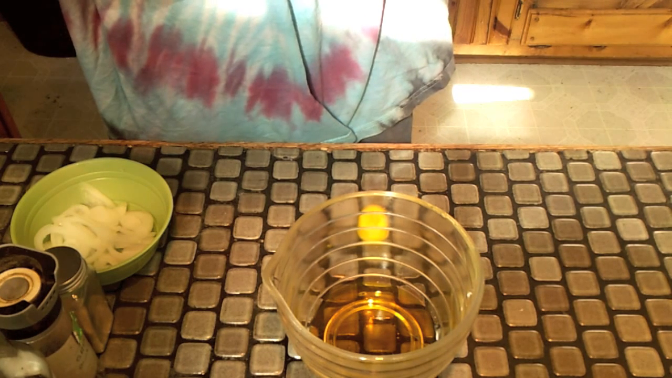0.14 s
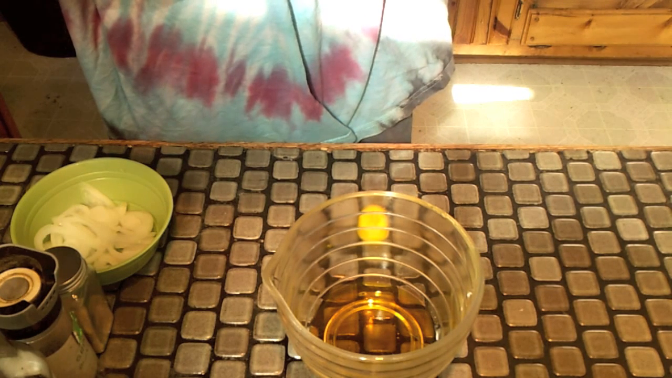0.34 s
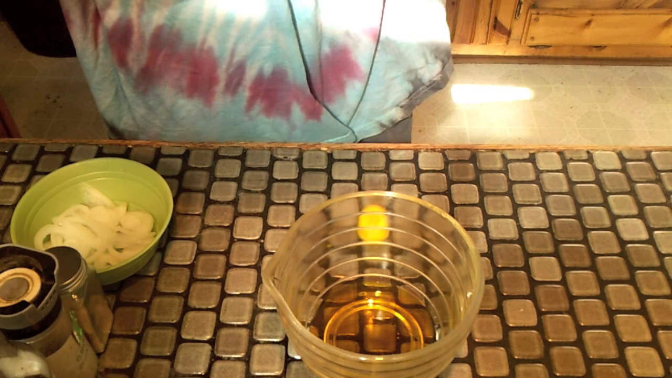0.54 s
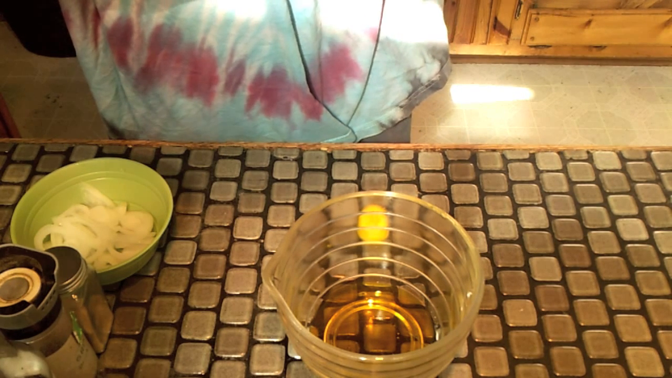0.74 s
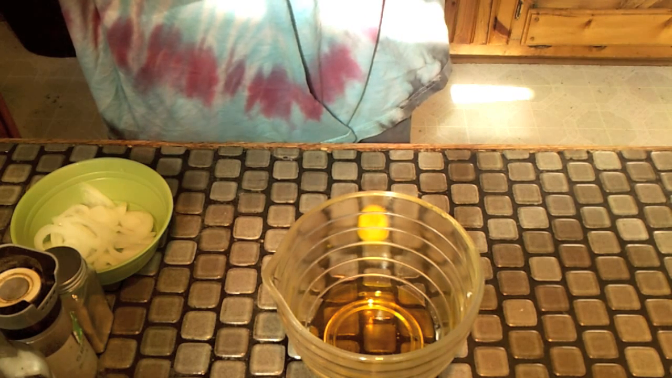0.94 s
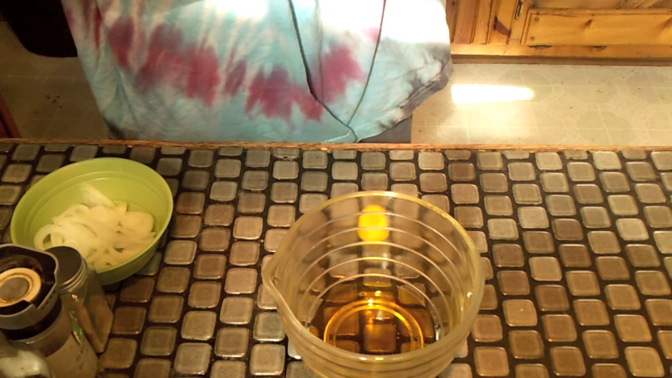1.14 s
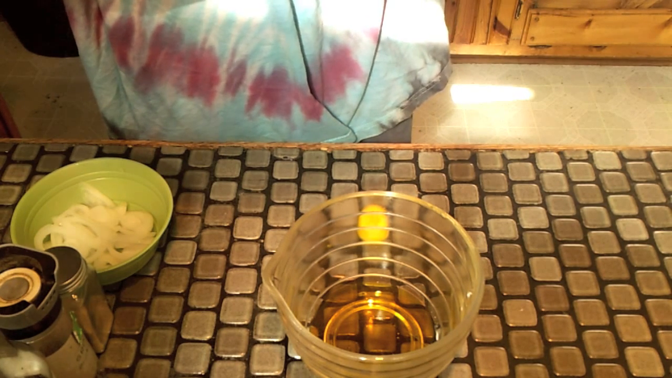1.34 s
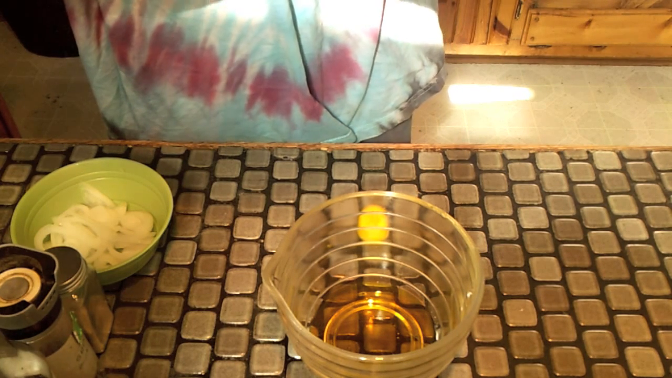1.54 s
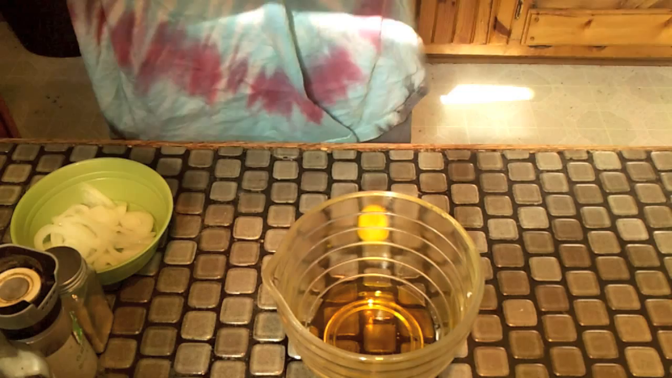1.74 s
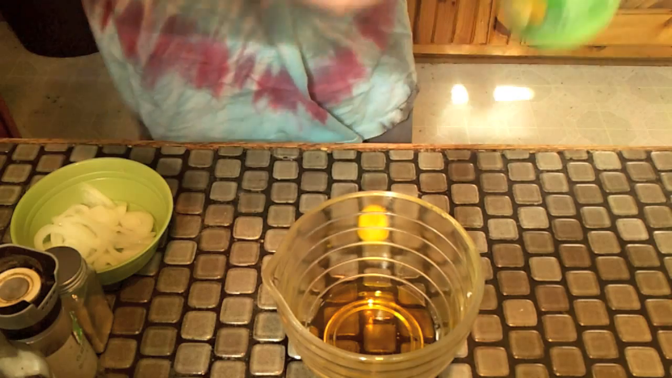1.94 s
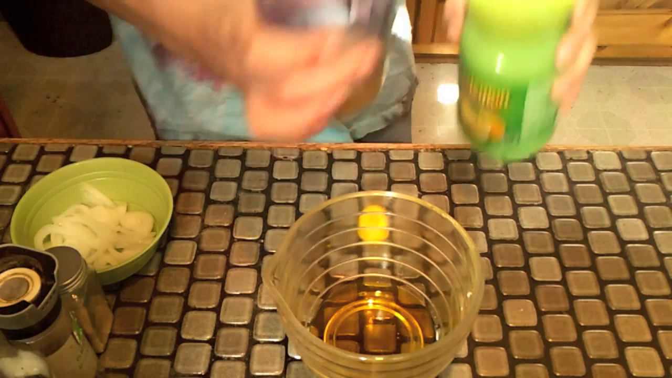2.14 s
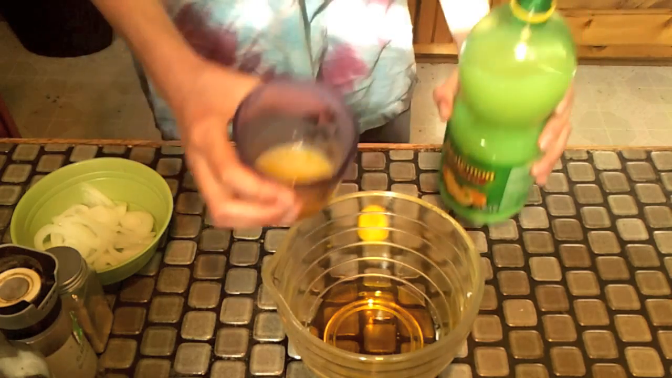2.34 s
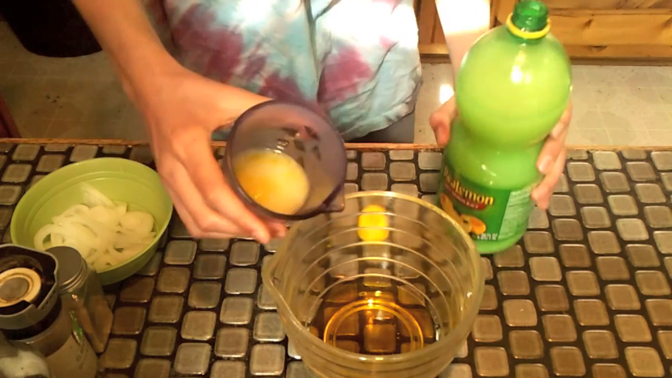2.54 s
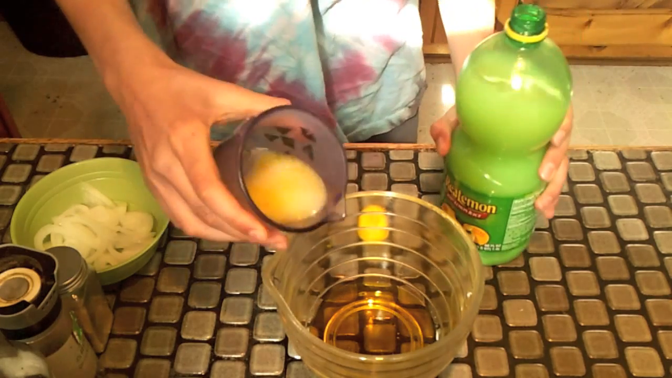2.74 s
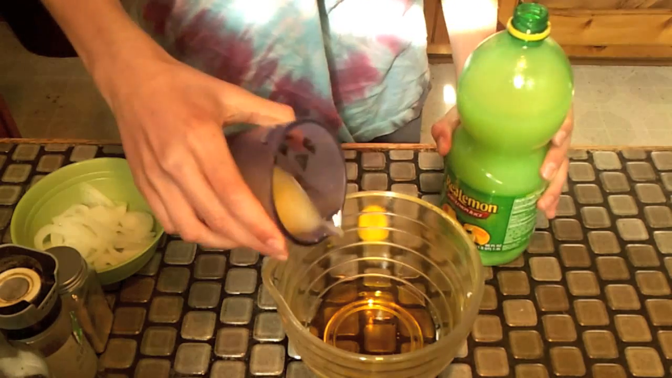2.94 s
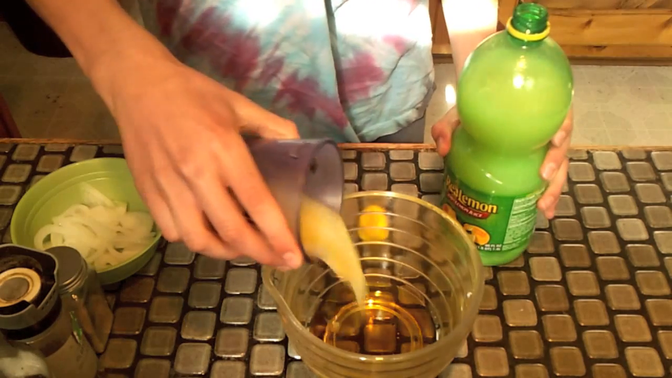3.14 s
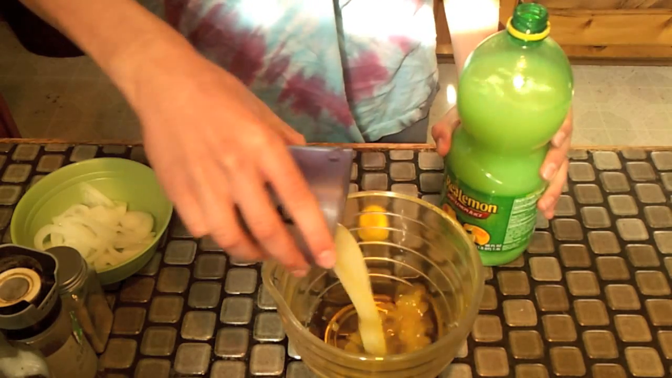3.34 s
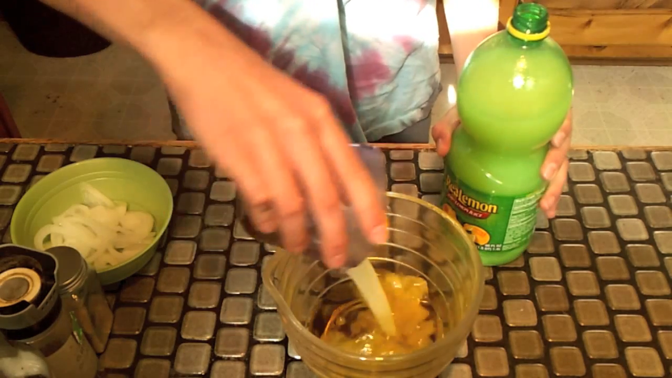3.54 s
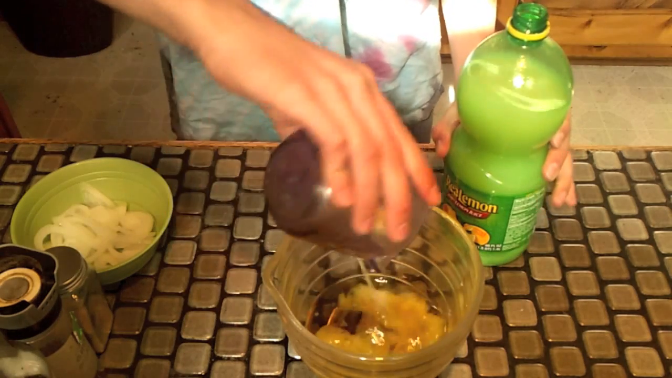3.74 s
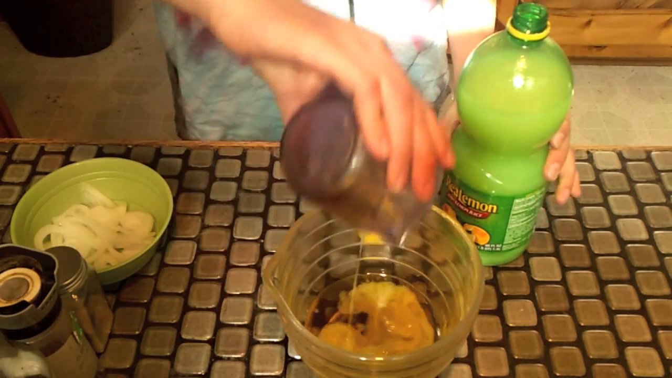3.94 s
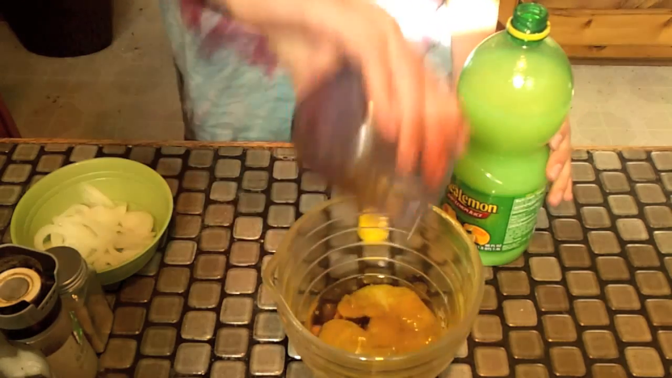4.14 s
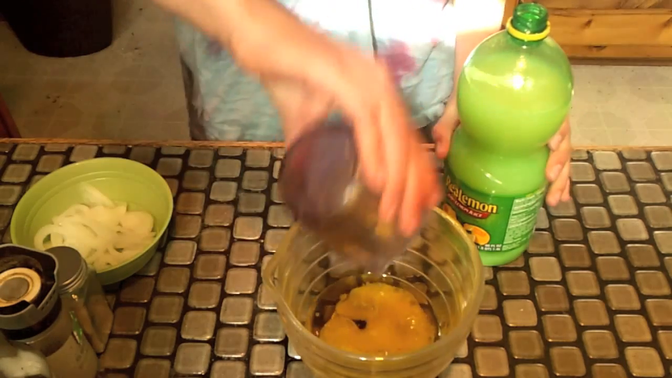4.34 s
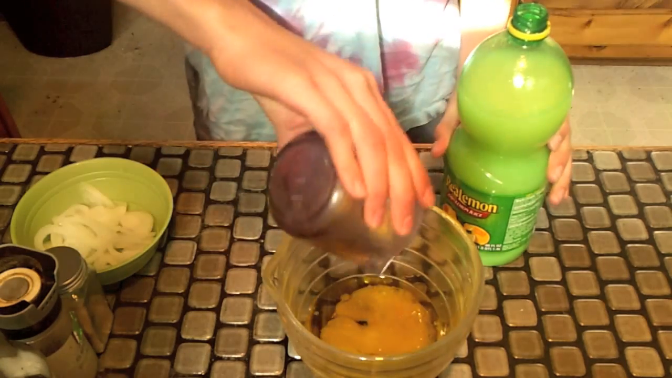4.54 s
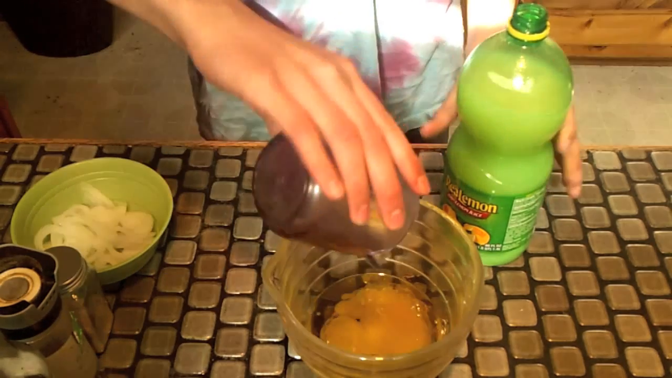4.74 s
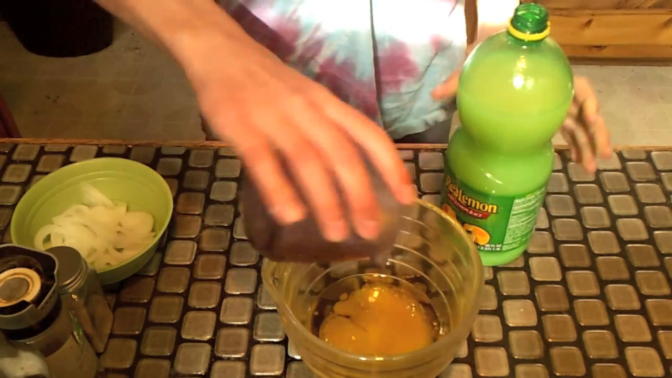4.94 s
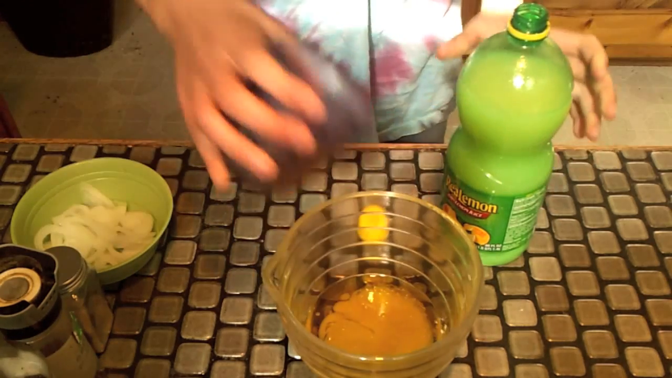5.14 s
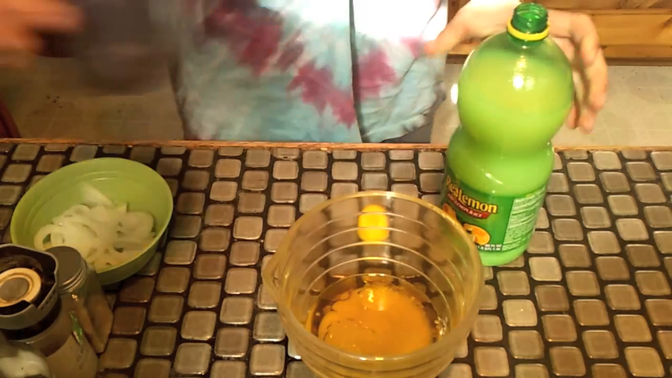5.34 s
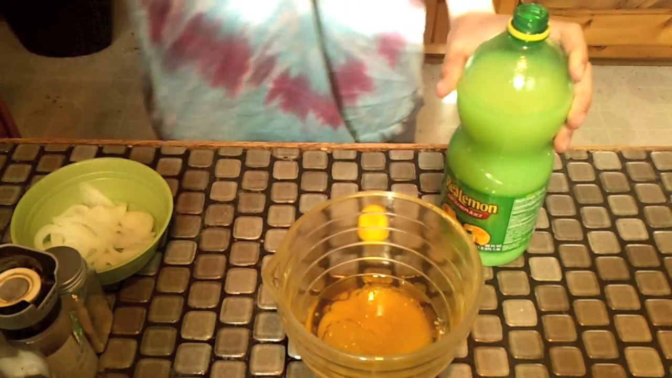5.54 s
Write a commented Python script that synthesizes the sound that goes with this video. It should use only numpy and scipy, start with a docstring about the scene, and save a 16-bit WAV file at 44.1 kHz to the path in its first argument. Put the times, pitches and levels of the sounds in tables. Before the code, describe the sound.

Small ticks, soft clothing rustles and a distant light knock come first, heard close up over kitchen room rumble and a faint high whine. Then comes the loudest sound, a bottle thumping onto tile, and the glass bowl beside it rings briefly. A short pour of juice into the bowl follows, with tiny high bubbles and a few sharp drips. Very faint far whistles and a last tick end it.

```python
"""Bottle and juice in a quiet kitchen

Close by, over room rumble and an electrical whine, cloth brushes and handled things tick. A bottle is set
down hard on a tiled counter and the glass bowl beside it rings. Juice tipped from a cup into the bowl
sounds as tiny ringing bubbles, then drips. Farther off are one light knock and a few faint whistles.
The microphone is a small one, with a treble peak and a gain control that ducks after loud sounds."""
import sys
import numpy as np
from scipy import signal
from scipy.fft import rfft, irfft, next_fast_len
from scipy.io import wavfile
from scipy.ndimage import uniform_filter1d

SR = 44100
rng = np.random.default_rng(int(sys.argv[2]) if len(sys.argv) > 2 else 0)


def transcribe(signal):
    """Save signal, clipped to [-1, 1], as a 16-bit WAV file at the path in sys.argv[1]."""
    frames = np.atleast_2d(signal).T
    limited = np.clip(frames, -1, 1)
    pcm = np.round(limited * 32767).astype(np.int16)
    wavfile.write(sys.argv[1], SR, pcm)


N = 246236

# spectrum of the empty room: frequency_hz, density_db
ROOM_SPECTRUM = [(12, 1), (22, -1), (50, -3), (86, -5), (134, -8), (200, -15), (330, -19.5), (500, -24),
                 (900, -30), (1600, -34), (2500, -37), (4500, -39), (7000, -41), (16000, -40)]
# slow swell of the rumble: time_s, gain_db
RUMBLE_SWELL = [(.5, 1.5), (4.4, -0.5), (5.3, 0.5)]
# lines of the electrical whine, lowest first: pitch_hz, rms_db
WHINE_LINES = [(5039, -71), (5642, -77), (5879, -58), (6121, -61), (6358, -69)]
# swell of the strongest line; the lowest sinks twice as far: time_s, gain_db
WHINE_SWELL = [(0, 0), (2, 0.5), (3, 3), (4.5, 2.5)]
# cloth and hands brushing: start_s, rise_s, t60_s, centre_hz, width_hz, level_db
RUSTLES = [(.19, 0.018, 0.25, 5000, 5000, -55), (0.545, 0.0023, 0.42, 2600, 6200, -45.5),
           (1.23, 0.0052, 0.15, 4630, 5000, -48), (2.2, 0.23, 1, 3850, 7000, -58),
           (5.0, 0.078, 1, 1590, 1500, -61), (5.33, 0.099, 0.37, 6100, 1500, -54.5)]
# dry ticks of things handled close by: start_s, level_db, pitch_hz
TICKS = [(.3833, -34.5, 6350), (.6526, -37, 2800), (.7063, -33, 4460), (0.725, -34, 6430),
         (0.7666, -27, 3350), (0.766, -24.5, 5920), (.8336, -32.5, 6850), (1.2369, -27, 4870),
         (1.2666, -27.5, 6260), (1.507, -36, 2940), (1.5174, -29, 5800), (1.659, -30, 6550),
         (1.701, -38, 6300), (2.1586, -36, 6030), (2.6054, -14, 5570), (2.8728, -32, 5820)]
# taps that leave a short ring or a dull hum: start_s, level_db, pitch_hz, t60_s
CLINKS = [(.3857, -36, 2610, 0.03), (0.6967, -32.5, 1090, 0.032), (0.714, -50, 2630, 0.089),
          (0.724, -47.5, 988, 0.22), (.765, -44.5, 867, 0.082), (1.233, -25.5, 1020, .014),
          (1.611, -41, 2920, 0.058), (1.7024, -49, 2310, 0.088), (2.049, -44, 351, 0.36),
          (2.849, -27.5, 209.5, 0.16)]
# pitchless clicks of hard contact or a splash: start_s, level_db
CLICKS = [(0.545, -31), (.731, -36), (1.235, -39), (1.517, -38.5), (1.659, -37), (1.701, -29.5),
          (3.321, -37), (3.548, -36), (3.6245, -38), (3.755, -49), (3.851, -30), (3.9213, -28),
          (3.943, -35), (3.9655, -35), (3.962, -31)]
# modes of a light thing put down farther off: pitch_hz, level_db, t60_s
KNOCK_MODES = [(328, -18.5, 0.37), (1108, -15, 0.1), (1640, -27, 0.038), (3391, -7, 0.0087),
               (5000, 2, 0.0059), (6520, -2.5, 0.0084)]
# its knock dying away: frequency_hz, density_db, t60_s
KNOCK_TAIL = [(300, 0, 0.08), (1090, -4, 0.18), (2400, -14.5, 0.25), (5000, -1.5, 0.18), (7000, -8, 0.18),
              (9900, -45, .08)]
# modes of bottle and counter: pitch_hz, level_db, t60_s
BOTTLE_MODES = [(158.4, -21, 0.49), (200.5, -19.5, 0.43), (228.4, -3, 0.19), (410, -13, 0.2),
                (473, -14, 0.074), (567, -13, 0.1), (685.6, -22.5, 0.46), (750, -9, 0.108),
                (1010, 2.5, 0.027), (1800, -34, 0.12), (3508, -0.5, 0.026), (3330, -12, 0.025),
                (3494, -22.5, 0.26), (3545, -21.5, .2), (3730, -15, .04), (4690, -7, 0.016),
                (6350, -8, 0.039), (6290, -28, .25), (9700, -38, 0.15)]
# the bottle's blow dying away in counter and room: frequency_hz, density_db, t60_s
BOTTLE_TAIL = [(90, -9, 0.54), (160, -10, 0.5), (398, -2.5, 0.33), (855, -3.5, 0.32), (1400, -14.5, 0.27),
               (2800, -20, 0.22), (5000, -27, 0.3), (6330, -18.5, 0.22), (7200, -26, 0.2), (11200, -57, .1)]
# modes of the glass bowl, in split pairs: pitch_hz, level_db, t60_s
BOWL_MODES = [(826.3, -30, 1.6), (849.2, -22, 0.8), (2105.5, -26.5, 0.69), (2172.8, -28, 0.65)]
# flow of the juice, as a level: time_s, level_db
JUICE_FLOW = [(3.3, -68), (3.42, -61.5), (3.83, -61.5), (3.86, -55.5), (3.97, -55.5), (4.06, -60),
              (4.3, -74)]
# single bubbles of the pour and the last drips: start_s, level_db, pitch_hz
BUBBLES = [(3.3219, -36.5, 1400), (3.416, -32, 5400), (3.446, -32.5, 4060), (3.4735, -33, 5430),
           (3.5081, -34, 5660), (3.517, -39.5, 2780), (3.5477, -32, 5880), (3.6247, -26, 5680),
           (3.7162, -37.5, 5400), (3.7546, -24.5, 6700), (3.764, -29, 5160), (3.8295, -35, 7300),
           (3.877, -36, 5200), (3.852, -39, 1570), (3.865, -38, 1780), (3.8703, -32, 6350),
           (3.922, -27, 7950), (3.9358, -31, 4200), (3.942, -38.5, 1450), (3.9568, -27, 6600),
           (3.9627, -28, 4350), (3.9757, -37, 2850), (3.983, -39, 2700), (4.0064, -28, 5870),
           (4.0095, -39, 2800), (4.1172, -33, 6500), (4.167, -33, 5880), (4.170, -36.5, 6240),
           (4.486, -44, 3870)]
# drops that hit hard: centre_s, level_db, pitch_hz
SPLATS = [(3.4007, -13, 5450), (3.8515, -34, 5700), (3.8518, -26, 4170), (4.1200, -28, 5800),
          (4.1201, -21.5, 4600)]
# far whistles: start_s, pitch_hz
WHISTLES = [(4.42, 1565), (4.552, 1565), (4.66, 1565), (4.96, 2050)]
# reflections off bowl and counter: lag_s, gain_db
NEAR_ECHOES = [(.0013, -17), (.0024, -13), (.0039, -17)]

BOTTLE_S, BOTTLE_DB = 2.5456, -4  # the one blow that rings bottle, counter and bowl


def from_db(db):
    """Decibels to gain."""
    return 10 ** (np.asarray(db) / 20)


def rms_one(x):
    """Scale to rms 1."""
    return x / np.sqrt(np.mean(x ** 2) + 1e-20)


def in_time(rows):
    """A (time_s, value) table at every sample."""
    return np.interp(np.arange(N) / SR, *np.transpose(rows))


def at_hz(rows, hz, column=1):
    """One column of a table, read along a log-frequency axis."""
    table = np.array(rows)
    return np.interp(np.log(hz), np.log(table[:, 0]), table[:, column])


def add(out, start_s, sound):
    """Mix a sound in at start_s."""
    i = round(start_s * SR)
    out[i:i + len(sound)] += sound[:N - i]


def butter(x, order, hz, kind="low"):
    """Butterworth filter."""
    return signal.sosfilt(signal.butter(order, hz, kind, fs=SR, output="sos"), x)


def resonance(x, hz, width_hz):
    """Pass a band around hz, gain 1 on top."""
    r, w = np.exp(-np.pi * width_hz / SR), 2 * np.pi * hz / SR
    gain = (1 - r * r) / 2
    return signal.lfilter([gain, 0, -gain], [1, -2 * r * np.cos(w), r * r], x)


def drift(rate_hz):
    """Smooth random wander, rms 1."""
    hop, settle = 40, 2000
    r = np.exp(-2 * np.pi * hop * rate_hz / SR)
    noise = rng.standard_normal(N // hop + settle + 2)
    slow = signal.lfilter([1], [1, -2 * r, r * r], noise)[settle:]
    return np.interp(np.arange(N) / hop, np.arange(len(slow)), rms_one(slow))


def room_tone(level_db=-40, heave_db=0.62):
    """Steady room noise whose rumble heaves and slowly swells."""
    hz = np.maximum(np.fft.rfftfreq(N, 1 / SR), 1)
    spectrum = rfft(rng.standard_normal(N)) * from_db(at_hz(ROOM_SPECTRUM, hz))
    tone = rms_one(irfft(spectrum, N))
    rumble = butter(tone, 2, 1500)
    swell = from_db(in_time(RUMBLE_SWELL) + heave_db * drift(15))
    return from_db(level_db) * (tone + (swell - 1) * rumble)


def whine(tone_hz=7867.1, tone_db=-59.5, flips_per_s=59.94):
    """Thin electrical lines that waver in level, and a tone whose sign keeps flipping."""
    t, swell_db = np.arange(N) / SR, in_time(WHINE_SWELL)
    flips = np.sign(np.sin(np.pi * flips_per_s * t))
    out = from_db(tone_db) * np.sin(2 * np.pi * tone_hz * t) * flips
    strongest = np.argmax([rms_db for _, rms_db in WHINE_LINES])
    for k, (hz, rms_db) in enumerate(WHINE_LINES):
        swell_share = 1 if k == strongest else -2 if k == 0 else 0
        level_db = rms_db + 1.2 * drift(2) + swell_share * swell_db
        out += np.sqrt(2) * from_db(level_db) * np.sin(2 * np.pi * (hz * t + rng.random()))
    return out


def rustles():
    """Cloth and hands: grainy noise that swells and fades with each brush."""
    out, t = np.zeros(N), np.arange(SR) / SR
    grainy = rng.standard_normal(N) * from_db(3 * drift(60))
    for start_s, rise_s, t60, hz, width_hz, level_db in RUSTLES:
        envelope = np.minimum(t / rise_s, 1) * from_db(level_db - 60 * np.maximum(t - rise_s, 0) / t60)
        brush = np.resize(grainy[round(start_s * SR):], SR)
        brush = resonance(resonance(brush, hz, width_hz), hz, width_hz)
        add(out, start_s, envelope * rms_one(brush))
    return butter(out, 4, 7500)


def pings(rows, glide, snap_db, roughness, attack_s=0.0003):
    """Short damped tones; all but the low ones open with a faint broad snap."""
    out = np.zeros(N)
    snaps = rng.standard_normal((len(rows), 64)) * np.exp(-np.arange(64) / 12)
    grain = 1 + roughness * drift(150)  # uneven contact shakes the ring
    for (start_s, level_db, hz, t60), snap in zip(rows, snaps):
        t = np.arange(round(t60 * SR)) / SR
        attack = (1 - np.exp(-t / max(attack_s, 1 / hz))) ** 3  # low tones take a cycle to build
        tone = np.sin(2 * np.pi * hz * (t + glide * t ** 2 / t60))
        add(out, start_s, attack * from_db(level_db - 60 * t / t60) * tone)
        if hz > 900:
            add(out, start_s, from_db(level_db / 2 + snap_db) * signal.lfilter([.5, .5], 1, snap))
    return out * grain


def handling(tick_t60_s=0.0067):
    """Small things touched close by, each ringing at one pitch."""
    ticks = [(*tick, tick_t60_s) for tick in TICKS]
    return pings(ticks + CLINKS, glide=0, snap_db=-30, roughness=.25)


def clicks(decay_s=0.00083):
    """Hard contacts and splashes: broad noise, gone in a few milliseconds."""
    out = np.zeros(N)
    bursts = rng.standard_normal((len(CLICKS), 300)) * np.exp(-np.arange(300) / (decay_s * SR))
    for (start_s, level_db), burst in zip(CLICKS, bursts):
        add(out, start_s, from_db(level_db) * burst)
    return butter(out, 3, [1500, 8400], "band")


def struck(start_s, modes, gain_db, build_s):
    """One blow rings every mode of a body."""
    out, t = np.zeros(N), np.arange(SR) / SR
    body = sum(from_db(db - 60 * t / t60) * np.sin(2 * np.pi * hz * t) for hz, db, t60 in modes)
    add(out, start_s, from_db(gain_db) * (1 - np.exp(-t / build_s)) * body)
    return out


def tail(start_s, table, gain_db):
    """Noise after a blow, each third of an octave dying at its own rate."""
    out, t = np.zeros(N), np.arange(SR // 2) / SR
    edges_hz = 50 * 2 ** np.arange(0, 8.5, 1 / 3)
    for low, high in zip(edges_hz, edges_hz[1:]):
        hz = np.sqrt(low * high)
        decay = from_db(at_hz(table, hz) - 60 * t / at_hz(table, hz, column=2))
        add(out, start_s, butter(rng.standard_normal(len(t)) * decay, 3, [low, high], "band"))
    return from_db(gain_db) * out


def far_knock(start_s=0.9197):
    """A light thing put down farther off rings briefly and leaves a noisy tail."""
    body = struck(start_s, KNOCK_MODES, gain_db=-19, build_s=0.0001)
    return body + tail(start_s, KNOCK_TAIL, gain_db=-26.5)


def crack(start_s, level_db, length_s):
    """A brief bright burst at a hard contact."""
    out, count = np.zeros(N), round(length_s * SR)
    burst = rng.standard_normal(400)[:count] * np.linspace(1, .3, count)
    add(out, start_s, from_db(level_db) * butter(burst, 3, [6000, 11000], "band"))
    return out


def bottle(rebound_s=2.6037):
    """The bottle hits the tile and rings with the counter, then rocks and touches again."""
    body = struck(BOTTLE_S, BOTTLE_MODES, BOTTLE_DB, build_s=0.00021)
    wash = tail(BOTTLE_S, BOTTLE_TAIL, gain_db=5)
    contact = crack(BOTTLE_S, level_db=-9, length_s=.003)
    rebound = crack(rebound_s, level_db=-30, length_s=.0022)
    return body + wash + contact + rebound


def bowl():
    """The glass bowl takes up the bottle's blow gradually; its paired modes beat."""
    return struck(BOTTLE_S, BOWL_MODES, BOTTLE_DB, build_s=0.035)


def ring(impulses, hz, t60):
    """Each impulse starts a dying sine of its own height."""
    r, w = from_db(-60 / (t60 * SR)), 2 * np.pi * hz / SR
    return signal.lfilter([0, np.sin(w)], [1, -2 * r * np.cos(w), r * r], impulses + 1e-18)


def trickle(full_flow_db=-54, full_flow_per_s=1200, cycles=30):
    """Tiny bubbles ring at random in the juice; more flow makes them louder and more frequent."""
    flow_db = in_time(JUICE_FLOW)
    per_s = full_flow_per_s * from_db(flow_db - full_flow_db) ** 1.5
    strengths = from_db(3.5 * np.minimum(rng.exponential(1, N), 4))
    births = strengths * (rng.random(N) < per_s / SR)
    pitches_hz = np.geomspace(3800, 7500, 16)
    choice = rng.integers(0, len(pitches_hz), N)
    fizz = sum(ring(births * (choice == k), hz, cycles / hz) for k, hz in enumerate(pitches_hz))
    return from_db(flow_db) * fizz


def bubbles(cycles=40):
    """Single bubbles near the surface glide up as they die, all within the same number of cycles."""
    rows = [(start_s, level_db, hz, cycles / hz) for start_s, level_db, hz in BUBBLES]
    return pings(rows, glide=.015, snap_db=-34, roughness=.35)


def splats(half_length_s=0.00041):
    """A hard drop gives a blip of a few cycles that swells and fades smoothly."""
    out, t = np.zeros(N), np.arange(-132, 132) / SR
    envelope = np.exp(-.5 * (t / half_length_s) ** 2)
    for centre_s, level_db, hz in SPLATS:
        add(out, centre_s + t[0], from_db(level_db) * envelope * np.cos(2 * np.pi * hz * t))
    return out


def far_whistles(length_s=0.08, level_db=-61):
    """Faint, brief pure tones from far away."""
    out, t = np.zeros(N), np.arange(round(length_s * SR)) / SR
    envelope = from_db(level_db) * np.sqrt(np.sin(np.pi * t / length_s))
    for start_s, hz in WHISTLES:
        add(out, start_s, envelope * np.sin(2 * np.pi * hz * t))
    return out


def cup_tick(start_s=5.2396, pitch_hz=5750, t60_s=0.0081):
    """One clean mode ticks as the cup is drawn back."""
    return struck(start_s, [(pitch_hz, 0, t60_s)], gain_db=-20, build_s=0.00016)


def with_near_echoes(x):
    """The direct sound and its first reflections off bowl and counter."""
    out = x.copy()
    for lag_s, gain_db in NEAR_ECHOES:
        add(out, lag_s, from_db(gain_db) * x)
    return out


def kitchen_reverb(x, t60_s=0.31, gain_db=-22.5, wall_cut_hz=2700):
    """Eight echo paths between the walls, duller on every round."""
    size = next_fast_len(N + SR)
    hz = np.fft.rfftfreq(size, 1 / SR)
    walls = 1 / (1 + 1j * hz / wall_cut_hz)
    echoes = 0
    for k, lag_s in enumerate(rng.uniform(0.0047, 0.027, 8)):
        loss = from_db(-60 * lag_s / t60_s) * walls ** (lag_s * 20)
        one_round = loss * np.exp(-2j * np.pi * hz * lag_s)
        echoes += (-1) ** k * one_round / (1 - one_round)
    return from_db(gain_db) * irfft(rfft(x, size) * echoes, size)[:N]


def scene():
    """What reaches the microphone, in mono: small close sounds with their echoes, blows and background."""
    small = handling() + trickle() + clicks() + bubbles() + splats()
    small = butter(small, 4, 8800)  # soft, wet contacts carry no high treble
    blow = butter(bottle() + bowl(), 2, 85.5, "high")  # small bodies send out no deep bass
    background = far_knock() + room_tone() + far_whistles()
    reverb = kitchen_reverb(small)
    close = with_near_echoes(small) + blow + rustles() + cup_tick()
    return (close + reverb + background)[None]


def record(dry, lift_db=9.5, knee_db=-26, duck_share=0.165, release_db_per_s=3):
    """Small microphone: treble peak, electrical whine, gain control, clipping and a band limit."""
    treble_peak = (from_db(lift_db) - 1) * resonance(dry, hz=6223, width_hz=650)
    mic = dry + treble_peak + whine()
    power = uniform_filter1d(mic ** 2, size=882, origin=440)  # over the last 20 ms
    over_db = np.maximum(10 * np.log10(power + 1e-12) - knee_db, 0)
    # the gain drops at once and creeps back
    release_db = release_db_per_s * np.arange(N) / SR
    duck_db = np.maximum.accumulate(duck_share * over_db + release_db, axis=1) - release_db
    clipped = np.clip(mic * from_db(-duck_db), -1, 1)
    return signal.sosfilt(signal.ellip(10, 1, 60, 15950, fs=SR, output="sos"), clipped)


dry = scene()
out = record(dry)
transcribe(out)
```